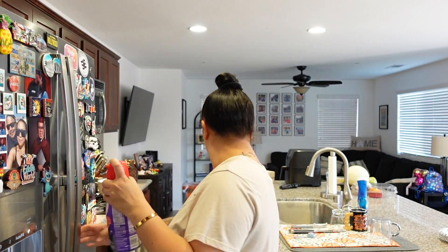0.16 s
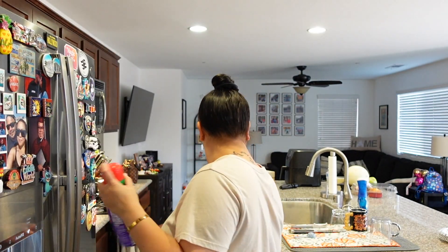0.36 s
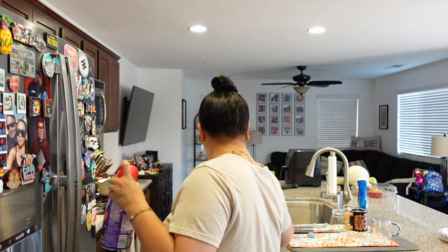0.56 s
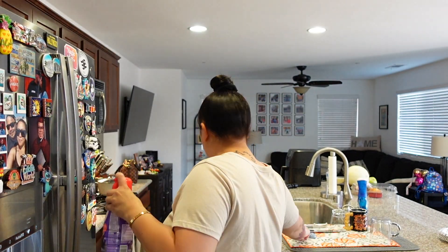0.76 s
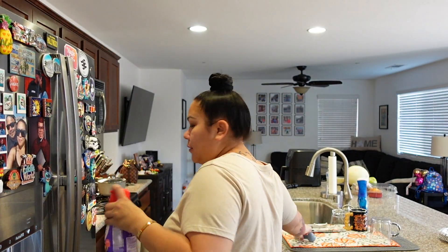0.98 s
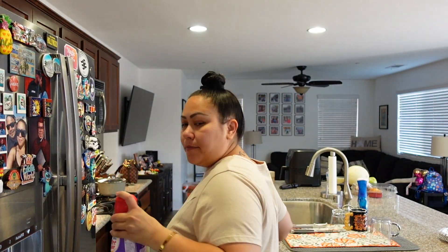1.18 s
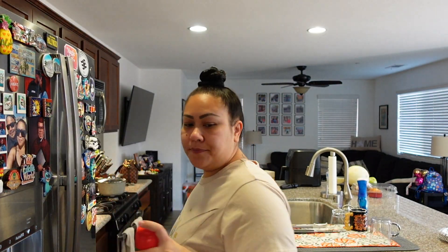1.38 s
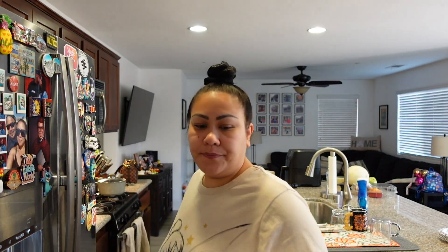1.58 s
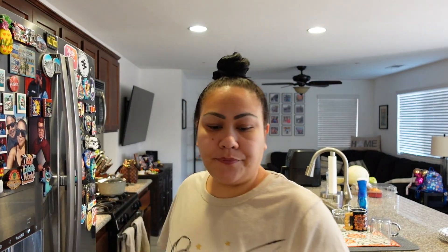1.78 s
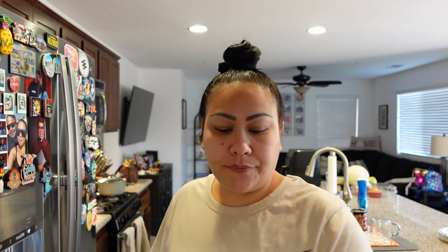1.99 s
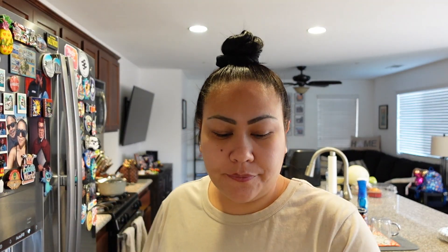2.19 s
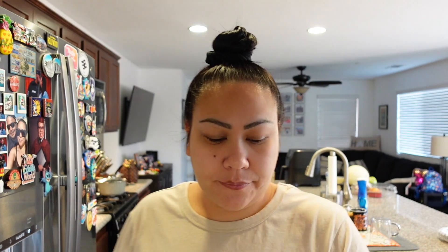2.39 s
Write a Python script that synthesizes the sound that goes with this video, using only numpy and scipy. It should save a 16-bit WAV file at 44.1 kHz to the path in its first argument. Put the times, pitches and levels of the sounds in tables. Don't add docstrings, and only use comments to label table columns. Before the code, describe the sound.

A fridge door shuts with a hard thud, then a plastic bag crackles and a bottle lands.

```python
import sys
import numpy as np
from scipy import signal
from scipy.fft import rfft, irfft, next_fast_len
from scipy.io import wavfile
from scipy.ndimage import uniform_filter1d

SR = 44100
rng = np.random.default_rng(int(sys.argv[2]) if len(sys.argv) > 2 else 0)


def to_wav(s):
    ch = np.atleast_2d(s).T
    pcm = np.round(np.clip(ch, -1, 1) * 32767)
    wavfile.write(sys.argv[1], SR, pcm.astype(np.int16))


def volts(x):
    e = np.asarray(x, float) / 20
    return 10 ** e


N = 107868


def read(table, hz):
    table = np.array(table)
    return np.interp(np.log(np.maximum(hz, 1)), np.log(table[:, 0]), table[:, 1])


def level(x, db):
    return x * volts(db) / np.sqrt(np.mean(x ** 2))


def colour(x, table):
    size = next_fast_len(x.shape[-1])
    gain = volts(read(table, np.fft.rfftfreq(size, 1 / SR)))
    return irfft(rfft(x, size) * gain, size)[..., :x.shape[-1]]


def band(x, hz, width_hz):
    return signal.lfilter(*signal.iirpeak(hz, hz / max(width_hz, 1), SR), x)


def walk(rate_hz):
    k = int(SR / rate_hz)
    steps = np.repeat(rng.standard_normal(N // k + 1), k)
    w = uniform_filter1d(uniform_filter1d(steps, k), k)[:N]
    return w / w.std()


def strike(at_s, db, push_ms, modes):
    t = np.arange(SR) / SR
    ring = 0
    for hz, mode_db, t60_s in modes:
        weight_db, detune = rng.standard_normal(2)
        tone = np.sin(2 * np.pi * hz * (1 + 0.0058 * detune) * t)
        ring = ring + volts(mode_db + weight_db) * tone * volts(-60 * t / max(t60_s, .003))
    phase = t[:SR // 50] / max(push_ms / 1000, 1 / SR)
    push = np.sin(np.pi * np.clip(phase + 0.064, 0, 1))
    ring = signal.fftconvolve(ring, push)[:SR]
    out = np.zeros(N + SR)
    start = int(at_s * SR)
    out[start:start + SR] = ring * volts(db) / np.abs(ring).max()
    return out[:N]


def burst(at_s, db, t60_s, table):
    age = np.arange(N) / SR - at_s
    noise = level(colour(rng.standard_normal(N), table), db)
    return noise * (age > 0) * volts(-60 * np.abs(age) / max(t60_s, .003))


def crackle(per_s, spread_db):
    grain_ms = 1.5
    starts = (rng.random(N) < per_s / SR) * volts(spread_db * np.minimum(rng.exponential(size=N), 4))
    envelope = signal.lfilter([1], [1, -np.exp(-1000 / grain_ms / SR)], starts)
    return level(envelope * rng.standard_normal(N), 0)


# (time [s], level [dB], push length [ms], rattle share [dB], frame share [dB])
DOOR_CONTACTS = [
    (.1527, -12, .09, 7, -17),
    (.1566, 1.5, 0.13, -0.5, -11),
    (.1599, -5.5, 0.06, 5, -0.5),
    (.1642, 0.5, 0.13, -6.5, -4),
    (.1675, -11, 0.36, -4, 4.5),
]
# (frequency [Hz], level [dB], t60 [s])
PANEL_MODES = [(1190, -27, .04), (1354, 3.5, 0.078), (1505, 1.5, 0.058), (2030, -7, 0.042),
               (2270, -6, 0.035), (2790, -14, 0.022), (3840, -8, 0.015)]
# (frequency [Hz], level [dB], t60 [s])
FRAME_MODES = [(492, -7.5, 0.066), (551, 0.5, 0.082), (686, -5, 0.075), (920, -7, .03)]
# (frequency [Hz], level [dB], t60 [s])
CABINET_MODES = [(63.5, -16, 0.54), (90.3, -6, 0.24), (136, 4.5, 0.15), (170, -7.5, 0.42), (255, -4, 0.13),
                 (400, -10, 0.15)]
# (frequency [Hz], level [dB])
RATTLE_COLOUR = [(150, -11), (320, -6), (560, -5), (1400, -2.1), (2800, -7), (4500, -14), (8000, -24.5),
                 (16000, -34.5)]


def door():
    peak_db, rattle_t60_s = -3.5, 0.036
    swing_hz, swing_db, swing_t60_s = 112, -46.5, 0.97
    panel = 0
    for s, db, push_ms, rattle_db, frame_db in DOOR_CONTACTS:
        panel = panel + strike(s, db, push_ms, PANEL_MODES)
        panel = panel + strike(s, db + frame_db, 3 * push_ms, FRAME_MODES)
        panel = panel + burst(s, db + rattle_db - 2.5, rattle_t60_s, RATTLE_COLOUR)
    panel = panel * volts(peak_db) / np.abs(panel).max()
    cabinet = strike(.186, -19, 4.3, CABINET_MODES)
    rush = level(band(rng.standard_normal(N), swing_hz, 240.0), swing_db)
    rush = rush * volts(-60 * np.arange(N) / SR / swing_t60_s)
    return panel + cabinet + rush


def slam():
    slam_s, slam_db = .156, -2
    blow = colour(1. * (np.arange(N) == int(slam_s * SR)), RATTLE_COLOUR)
    return blow * volts(slam_db) / np.sqrt(np.sum(blow ** 2)) * 4


# (time [s], level [dB])
EFFORT_AT_DOOR = [
    (0, -38.5),
    (.09, -49.5),
    (.14, -43.5),
]
# (time [s], level [dB])
EFFORT_RUSTLE = [(.47, -69), (.53, -48.5), (.57, -51.5), (.62, -52.5), (0.689, -51.5), (.75, -46),
                 (.86, -53.5), (1.07, -56.5), (1.201, -44.5), (1.344, -55.5), (1.353, -45.5), (1.53, -51.5),
                 (1.699, -58.5), (1.92, -78.5)]
# (time [s], level [dB])
EFFORT_AT_END = [
    (2.3, -60.5),
    (2.389, -47),
    (2.45, -58.5),
]
# (frequency [Hz], level per Hz [dB])
FILM_COLOUR = [(180, -42), (300, -69), (559, -4), (884, -8), (1490, -0.5), (2170, -5), (2920, -0.5),
               (5010, -9), (15000, -37.5)]
# (frequency [Hz], width [Hz], level [dB])
BAG_HOLLOWS = [(587, 173, 0.5), (1500, 710, 1.5), (2870, 220, -7.5), (5000, 1100, -12.5)]


def film_crackle():
    t = np.arange(N) / SR
    effort = 0
    for part in (EFFORT_AT_DOOR, EFFORT_RUSTLE, EFFORT_AT_END):
        at, db = np.array(part).T
        gate = np.interp(t, [at[0] - .04, at[0], at[-1], at[-1] + .04], [0, 1, 1, 0])
        effort = effort + volts(np.interp(t, at, db)) * gate
    clicks = crackle(per_s=2200, spread_db=2.2) * volts(1.2 * walk(25.22))
    hollow = sum(volts(db) * band(clicks, hz, width_hz) for hz, width_hz, db in BAG_HOLLOWS)
    return level(level(colour(clicks, FILM_COLOUR), 0) + level(hollow, -4), 4) * effort


def crease_noise():
    return crackle(per_s=6000, spread_db=1)


def low_hollow(noise):
    hz = 567
    return level(band(band(noise, hz, 144.0), hz, 400.), 0)


def swell(start_s, length_s):
    age = np.clip((np.arange(N) / SR - start_s) / max(length_s, .002), 0, 9)
    return np.clip(age / 0.38, 0, 1) * np.exp(-age ** 1.4)


# (time [s], peak [dB], pitch [Hz], brightness [dB], length [s])
CREASE_EVENTS = [(.512, -40, 1640, -4, .015), (0.592, -29.5, 1560, -4, 0.014),
                 (.611, -24.5, 1550, -32, 0.01), (0.619, -31, 5000, -11.5, 0.012),
                 (.653, -29, 1550, -28, 0.014), (0.71, -33, 1550, -9, 0.018),
                 (0.774, -26.5, 1380, -9.5, 0.0052), (0.789, -31, 1500, -9, 0.017),
                 (0.896, -33.5, 1560, -4, 0.02), (0.941, -37, 1500, -14, 0.012),
                 (0.951, -32.5, 1110, -28, 0.022), (0.982, -32, 1390, -10, 0.0086),
                 (.988, -36.5, 2870, -3, 0.01), (1.099, -38, 1500, -8, 0.017),
                 (1.135, -30, 1390, -14, 0.021), (1.163, -39, 1500, 6.5, 0.0087),
                 (1.201, -31.5, 1340, 0, 0.012), (1.212, -29, 1370, -9, 0.011),
                 (1.239, -25, 1450, -9.5, 0.01), (1.353, -36, 2780, -8, 0.013),
                 (1.403, -38, 1470, -15, 0.0068), (1.426, -34, 1750, -9, 0.015),
                 (1.445, -20, 1750, -27, 0.01), (1.491, -34.5, 1080, -6, 0.0059),
                 (1.545, -19.5, 1654, -19, 0.013), (1.552, -29.5, 1500, -7.5, 0.016),
                 (1.556, -24.5, 3000, -21, 0.017), (1.582, -40, 1700, -20, 0.008),
                 (1.628, -27.5, 1770, -6.5, 0.013), (1.637, -32.5, 1810, 0, 0.019),
                 (1.706, -37, 2020, -12, 0.017), (1.779, -37.5, 1310, -8, 0.012),
                 (1.796, -29.5, 1500, -14, 0.0093), (2.392, -27.5, 1760, -25, 0.011)]


def creases():
    sharpness, crease_db, low_db = 4.35, -6, -16
    snaps, sheen = crease_noise(), crease_noise()
    low = low_hollow(snaps)
    body = level(colour(sheen, FILM_COLOUR), -2)
    bright = band(body, 2970.0, 850.0) + band(body, 5500.0, 1400.0) + volts(9) * band(body, 8900.0, 5900.0)
    bright = level(bright, 0)
    out = np.zeros(N)
    for s, db, hz, bright_db, length_s in CREASE_EVENTS:
        part = slice(int(s * SR), min(int(s * SR) + SR // 8, N))
        shape = swell(s, length_s)[part] / np.std(snaps[part][:int(length_s * SR) + 20])
        width_hz = hz / sharpness
        ring = band(band(snaps[part] * shape, hz, width_hz), hz, 3 * width_hz)
        ring = ring * np.sqrt(SR / np.pi / width_hz)
        grit = volts(low_db) * low[part] + volts(bright_db) * bright[part]
        grit = grit + volts(-3.5 + bright_db / 2) * body[part]
        out[part] += volts(db + crease_db) * (ring + shape * grit)
    return out


# (time [s], peak [dB], push length [ms])
FOLD_SNAPS = [
    (.6125, -30, .2),
    (.7755, -31, .2),
    (1.2405, -27, .2),
    (1.3515, -35, .1),
    (1.3965, -24, .25),
    (1.4473, -23, .2),
    (1.559, -22, .15),
    (1.6315, -25, .15),
    (1.7985, -30, .25),
]
# (frequency [Hz], level [dB], t60 [s])
FOLD_MODES = [(1230, -1.5, 0.033), (1500, 6.5, 0.032), (1950, 3, 0.016), (3030, -32, .008)]
# (frequency [Hz], level [dB])
FOLD_COLOUR = [(150, -30), (700, 0)]


def folds():
    return colour(sum(strike(s, db, push_ms, FOLD_MODES) for s, db, push_ms in FOLD_SNAPS), FOLD_COLOUR)


# (time [s], level [dB], length [s])
CONTENT_KNOCKS = [
    (1.43, -26.5, 0.019),
    (1.453, -26, 0.0073),
    (1.51, -50, 0.0088),
    (1.551, -29, 0.0059),
    (1.564, -33, 0.011),
    (1.63, -39, 0.014),
]


def contents():
    shape = sum(volts(db - 13) * swell(s, length_s) for s, db, length_s in CONTENT_KNOCKS)
    return low_hollow(crease_noise()) * shape


def bag():
    return film_crackle() + creases() + folds() + contents()


# (time [s], level [dB], push length [ms], scrape share [dB])
BOTTLE_CONTACTS = [
    (2.1778, -29, 0.46, 3),
    (2.186, -31, 0.46, -5),
    (2.2139, -13, 0.24, -10),
    (2.2161, -13, 0.34, -10),
    (2.2216, -14.5, 0.65, -12),
    (2.334, -82, .5, -13),
    (2.375, -39.5, 0.16, 5),
    (2.399, -38, .3, 3.5),
]
# (frequency [Hz], level [dB], t60 [s])
BOTTLE_MODES = [(750, -9, 0.021), (1350, -7, 0.046), (1283, -1, 0.049), (1640, -0.5, 0.041),
                (1790, 1, 0.02), (2234, 8, 0.013), (4200, -22, .2), (6140, -36, .2)]
# (frequency [Hz], level [dB])
TOUCH_SCRAPE = [(350, -58), (600, -14), (1590, -1.5), (1750, -6.5), (5790, -19.5), (9240, -16.5),
                (16000, -38)]
# (frequency [Hz], level [dB])
LANDING_SCRAPE = [(350, -11), (600, -3.5), (1640, -4.5), (2010, -8), (4110, -13), (16000, -36.5)]


def bottle():
    scrape_t60_s = 0.096
    out = 0
    for i, (s, db, push_ms, scrape_db) in enumerate(BOTTLE_CONTACTS):
        foot = TOUCH_SCRAPE if i < 2 else LANDING_SCRAPE
        out = out + strike(s, db, push_ms, BOTTLE_MODES)
        out = out + burst(s, db + scrape_db - 5.5, scrape_t60_s, foot)
    return out


# (time [s], peak [dB])
SLAB_THUDS = [
    (2.179, -26.5),
    (2.2049, -25.5),
    (2.2155, -12),
    (2.335, -37),
    (2.376, -41),
    (2.415, -41),
]
# (frequency [Hz], level [dB], t60 [s])
SLAB_MODES = [(104, -8, .14), (141, 0, .07), (172, -6.5, .28), (209, -6.5, .2), (270, -20, .2),
              (432, -20, .12)]
SLAB_SIGNS = [1, -1, 1, 1, -1, 1]


def counter():
    thud_ms, thud_db = 2.2, -2.5
    modes = [(sign * hz, db, t60_s) for sign, (hz, db, t60_s) in zip(SLAB_SIGNS, SLAB_MODES)]
    return sum(strike(s, db + thud_db, thud_ms, modes) for s, db in SLAB_THUDS)


# (frequency [Hz], t60 [s])
ROOM_DECAY = [(80, 0.99), (250, 0.6745), (600, .5), (1500, 0.56), (4000, 0.55), (8000, 0.4), (14000, 0.28)]
# (frequency [Hz], level [dB])
ROOM_COLOUR = [(80, -0.5), (250, 2.5), (600, 2.9), (1500, 0), (4000, -2.5), (8000, 1), (14000, -6)]
# (frequency [Hz], side level [dB])
SIDE_COLOUR = [(80, -22), (250, -19), (600, -13), (1500, -13), (4000, -17), (8500, -14), (13000, -27)]


def room(x):
    build_s = 0.021
    t = np.arange(SR) / SR
    tail = 0
    for hz in 45 * 2 ** np.arange(0, 8.6, 1 / 3):
        mid, side = band(band(rng.standard_normal((2, SR)), hz, hz / 2), hz, hz / 2)
        side = volts(read(SIDE_COLOUR, hz)) * side
        fade = volts(read(ROOM_COLOUR, hz) - 60 * t / max(read(ROOM_DECAY, hz), .05))
        tail = tail + fade * np.array([mid + side, mid - side])
    tail = tail * (1 - np.exp(-(t / build_s) ** 2))
    tail = tail / np.sqrt(np.sum(tail ** 2) / 2)
    return signal.fftconvolve(x[None], tail, axes=1)[:, :N]


# (frequency [Hz], level [dB])
HUM_COLOUR = [(35, -30), (70, -11), (150, -.5), (320, -6), (1000, -6), (3000, -7), (8000, -17),
              (16000, -31)]


def fridge():
    fan_hz, fan_width_hz, fan_db = 590, 200, -56
    compressor_hz, compressor_width_hz, compressor_db = 106, 12, -69
    hum_db = -55
    noise = rng.standard_normal((4, N))
    fan = band(band(noise[:2], fan_hz, fan_width_hz), fan_hz, 2 * fan_width_hz)
    fan = level(fan, fan_db) * volts(2 * walk(12))
    hum = level(colour(noise[2:], HUM_COLOUR), hum_db) * volts(0.28 * walk(5.7))
    mid, side = hum + fan
    mid = mid + level(band(noise[0], compressor_hz, compressor_width_hz), compressor_db)
    side = colour(side, SIDE_COLOUR)
    return np.array([mid + side, mid - side])


def scene():
    door_wet_db, bag_wet_db, bottle_wet_db, slab_wet_db = -15.5, -10, -13, -20
    dry_side_db, lean_db = -3, -0.4
    shut, film, jar, slab = door(), bag(), bottle(), counter()
    near = shut + film + jar + slab
    send = slam() + volts(door_wet_db) * shut + volts(bag_wet_db) * film
    send = send + volts(bottle_wet_db) * jar + volts(slab_wet_db) * slab
    wet = room(send)
    late = volts(dry_side_db) * colour(np.roll(near, 9), SIDE_COLOUR)
    direct = np.array([near + late, near - late])
    return (direct + wet + fridge()) * volts(np.array([[lean_db], [-lean_db]]) / 2)


def roll_off(x):
    return signal.sosfilt(signal.butter(12, 16520, fs=SR, output="sos"), x)


def record(dry):
    top_cut = signal.ellip(10, .2, 70, 16000, fs=SR, output="sos")
    bass_cut = signal.butter(3, 56, "high", fs=SR, output="sos")
    mix = signal.sosfiltfilt(bass_cut, signal.sosfilt(top_cut, dry))
    return roll_off(mix)


dry = scene()
out = record(dry)
to_wav(out)
```